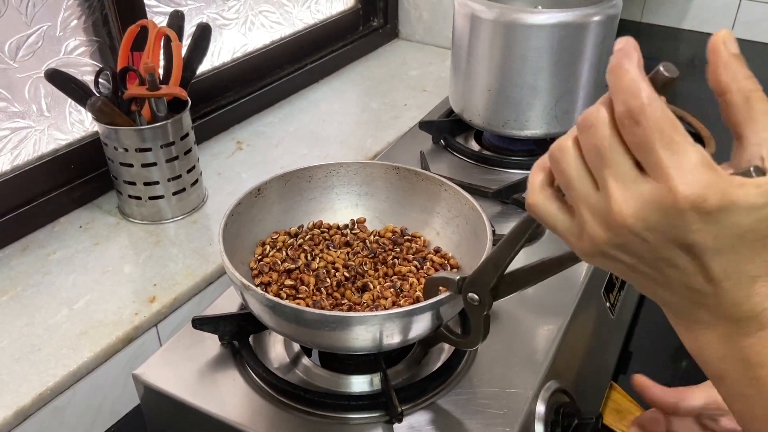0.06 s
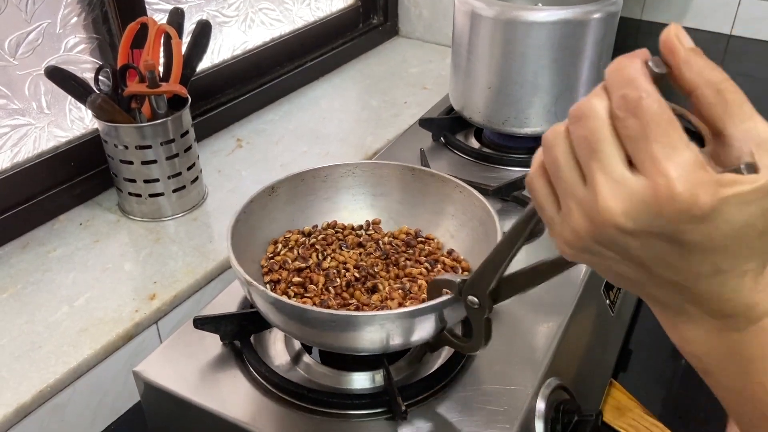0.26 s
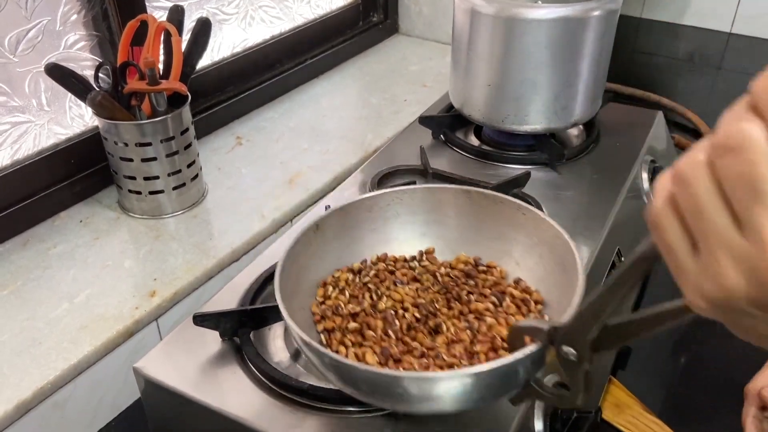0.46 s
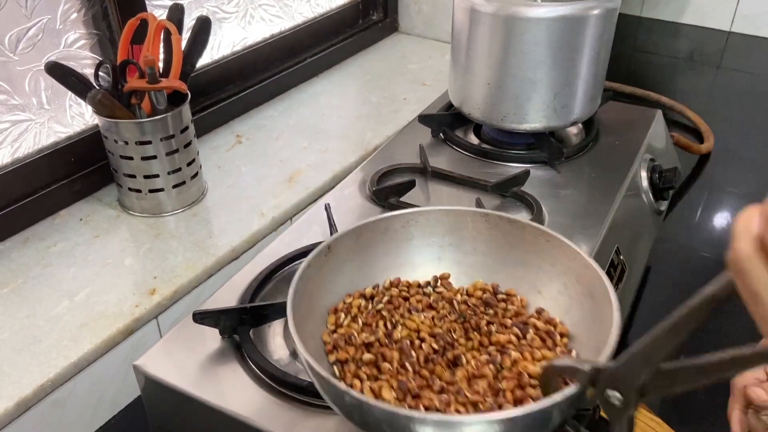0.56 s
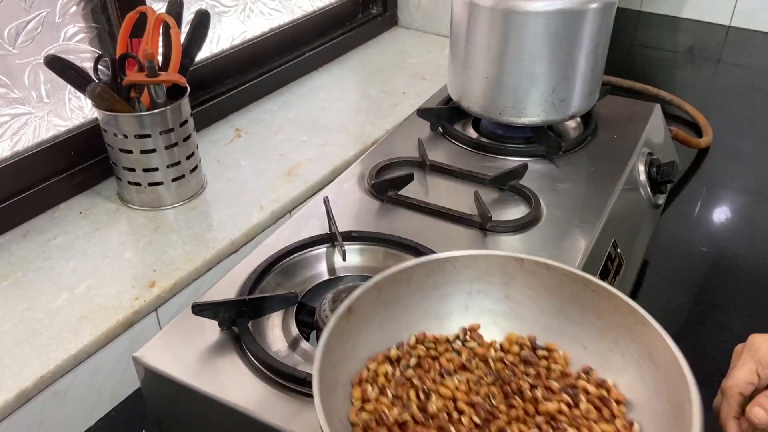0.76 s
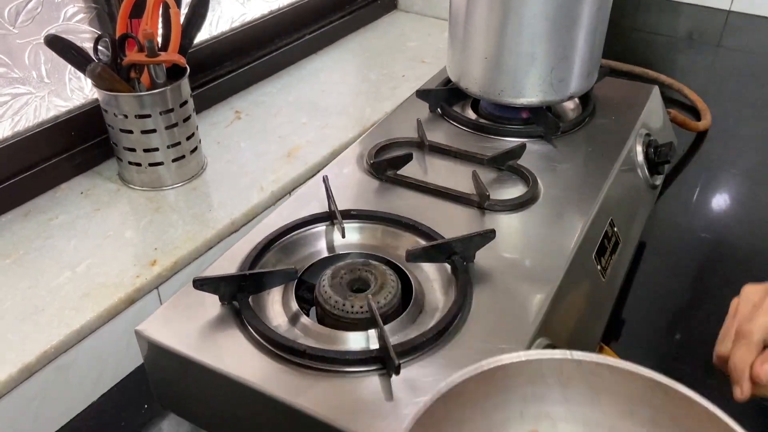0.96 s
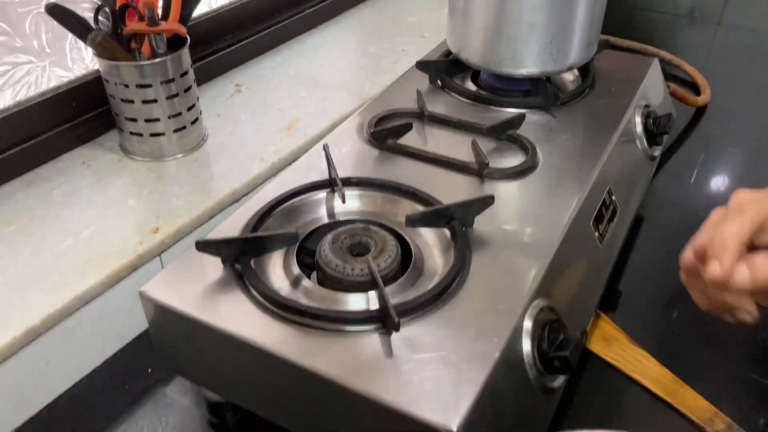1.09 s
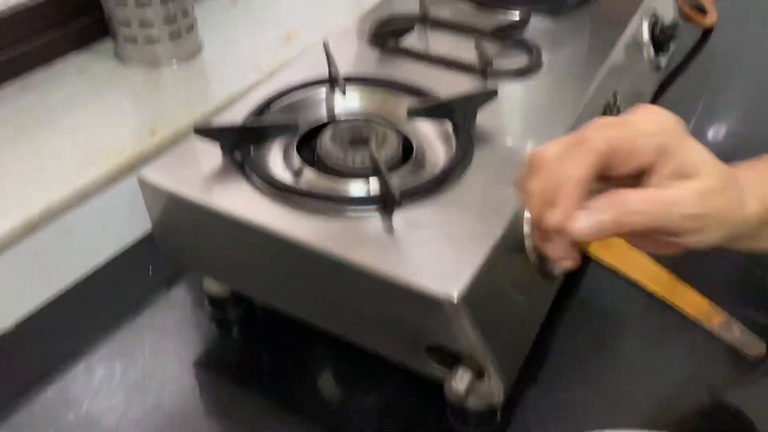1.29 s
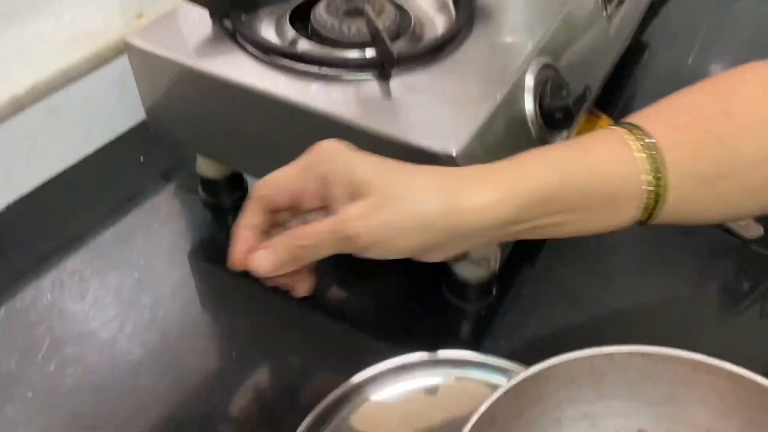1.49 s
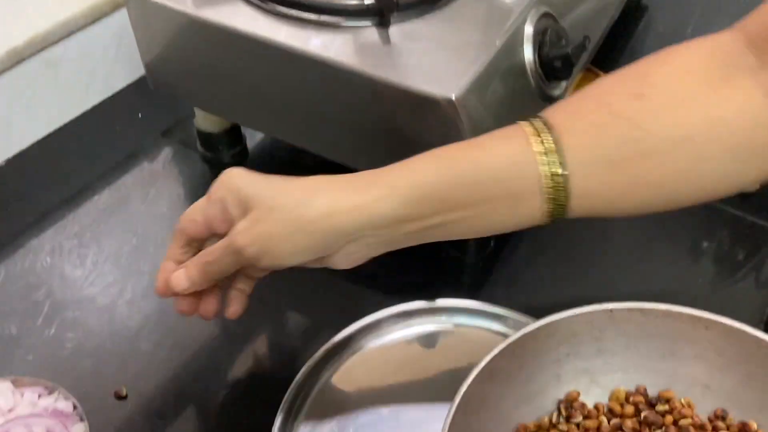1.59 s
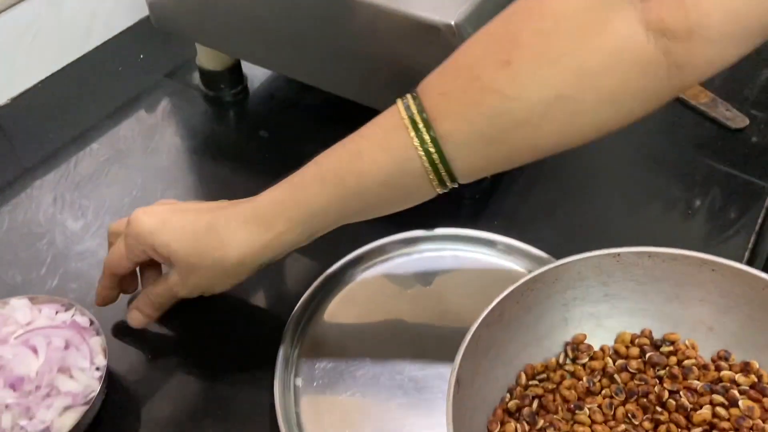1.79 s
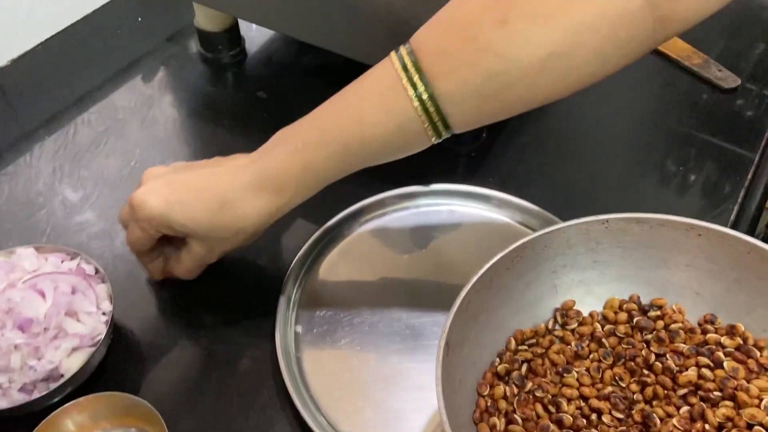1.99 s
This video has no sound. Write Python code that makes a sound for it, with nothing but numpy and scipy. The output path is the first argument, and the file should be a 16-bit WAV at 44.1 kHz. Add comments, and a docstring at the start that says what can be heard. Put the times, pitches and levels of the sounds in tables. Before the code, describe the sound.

Loud snapping beans, first a fading crack, then a close pair, a dull metallic scrape under them, a lone pop, and a denser run of snaps with tiny steam squeaks; quiet gas hum, bright hard-walled kitchen, stereo close microphone.

```python
"""The ringing end of a crack opens the scene, over a pan's rough scrape: dry beans roast in a small tiled kitchen.
The pan sticks and slips off the burner grate and is carried close past the microphone while beans burst.
Each burst is a sharp noise crack with a knock, decaying shell tones and a low thump of falling pitch;
some follow a squeak of steam, made of wobbling whistles and hiss. Decaying noise makes the bright room.
Coloured noise makes the stove's flame, sines a low hum and soft swells of air underneath."""
import sys
import numpy as np
from scipy import signal
from scipy.fft import rfft, irfft
from scipy.io import wavfile
from scipy.ndimage import uniform_filter1d

SR = 44100
rng = np.random.default_rng(int(sys.argv[2]) if len(sys.argv) > 2 else 0)


def wav_out(sig):
    """Save sig, one row per channel (or a flat mono array), as 16-bit PCM at SR to the path in sys.argv[1]."""
    wavfile.write(sys.argv[1], SR, np.round(np.clip(np.atleast_2d(sig).T, -1, 1) * 32767).astype(np.int16))


N = 90404  # length in samples
LEAD = SR // 5  # samples of track ahead of time zero, for sounds already under way

# likeness of left and right for the spread sources: frequency_hz, likeness (0 to 1)
LEFT_RIGHT_LIKENESS = [(50, 1), (200, 1), (500, 0.61), (1200, 0.089), (6000, 0.2)]


def amp(db):
    """A level in decibels is a logarithmic ratio; returns the amplitude gain."""
    return 10 ** (np.asarray(db) / 20)


def unit(x):
    """Normalizes mean power: scales to rms 1."""
    return x / np.sqrt(np.mean(x ** 2) + 1e-20)


def read(points, hz):
    """Interpolates a table over log frequency, near the ear's own scale of pitch."""
    f, value = np.transpose(points)
    return np.interp(np.log(hz + 1), np.log(f + 1), value)


def level(points):
    """An envelope: gain over time, linear in decibels between (s, dB) points."""
    return amp(np.interp(np.arange(N) / SR, *np.transpose(points)))


def add(mix, s, sound):
    """Superposition: adds a sound at time s to a track that starts LEAD samples early."""
    part = mix[max(round(s * SR) + LEAD, 0):][:len(sound)]
    part += sound[:len(part)]


def colour(x, points, size=2048):
    """Minimum-phase filter of unit energy: the log gain's Hilbert transform gives a causal phase."""
    log_gain = np.log(amp(read(points, abs(np.fft.fftfreq(size, 1 / SR)))))
    taps = np.fft.ifft(np.exp(signal.hilbert(log_gain).conj())).real
    return signal.lfilter(taps / np.linalg.norm(taps), 1, x)


def tilted(points, db_per_octave):
    """Spectral tilt: a spectrum made brighter or duller around 5 kHz."""
    return [(hz, db + db_per_octave * np.log2(hz / 5000)) for hz, db in points]


def pair(z, likeness):
    """Coherence: mid and side sums give two unrelated signals a likeness at each frequency."""
    c = np.clip(read(likeness, np.fft.rfftfreq(z.shape[1], 1 / SR)), 0, 1)
    a, b = rfft(z)
    mid = a * np.sqrt((1 + c) / 2)
    side = b * np.sqrt((1 - c) / 2)
    return irfft(np.array([mid + side, mid - side]), z.shape[1])


def room(x):
    """Reverberation: dense early reflections from stove and counter, then the longer ring of the tiles."""
    # reverberation time of the tiles: frequency_hz, t60_s
    tile_t60 = [(250, 0.54), (700, 0.49), (1800, 0.66), (4600, 0.64), (8000, 0.56), (15000, 0.43)]
    early_t60_s, early_db = 0.16, 16  # level relative to the onset of the tiles' ring
    rise_s = 0.0006
    hz, t, z = signal.stft(rng.standard_normal((2, SR)), SR, nperseg=256)
    tiles = amp(-60 * t / read(tile_t60, hz)[:, None])
    early = amp(early_db - 60 * t / early_t60_s)
    tail = signal.istft(z * np.hypot(tiles, early), SR, nperseg=256)[1]
    rise = np.minimum(np.arange(tail.shape[1]) / SR / rise_s, 1)
    tail = pair(tail * rise, [(100, 1.0), (450, 0.32)])  # bass alike, the rest diffuse
    return signal.fftconvolve(x[None], tail / np.linalg.norm(tail[0]), axes=1)[:, :len(x)]


def crack(decay_ms):
    """Impulsive release: a plain click and the tearing skin, whitened, then faded to unit energy."""
    click_share = 0.33  # plain click against tearing of unit energy
    ms = np.arange(SR // 100) * 1000 / SR
    tear = rng.standard_normal(len(ms)) * np.exp(-ms / decay_ms)
    z = rfft(tear / np.linalg.norm(tear)) - click_share
    even = irfft(z / abs(z), len(ms))  # keeps the phase, flattens the spectrum
    burst = even * np.exp(-ms / decay_ms / 6)
    return np.pad(burst / np.linalg.norm(burst), (0, SR - len(ms)))


def thump(decay_ms):
    """A downward chirp: pitch falls roughly as sweep / time and settles into a faint boom."""
    end_hz, sweep_cycles, rise_s = 42.3, 1.088, 0.0016
    boom_db, boom_s = -32, 0.062  # relative to the thump; decay time constant
    t = np.arange(SR // 2) / SR
    hz = np.hypot(end_hz, sweep_cycles / (t + 0.00035))
    rise = 1 - np.exp(-(t / rise_s) ** 2.5)
    fade = np.exp(-1000 * t / decay_ms) + amp(boom_db) * np.exp(-t / boom_s)
    return rise * fade * np.sin(2 * np.pi * np.cumsum(hz) / SR)


def pops():
    """Impulse excitation: each bean cracks, knocks, rings and thumps; the room throws the crack back."""
    # bursting beans: start_s, crack_db, crack_decay_ms (of the tear before whitening), shell_pitch_hz,
    # shell_db, brightness_db_per_octave, knock_db, room_db, thump_db, thump_decay_ms
    beans = [(-.055, 2, .54, 6500, -9, -3, -15, 4.5, -47.5, 12),
             (.209, -39, 0.8, 6600, -45, -5, -53.5, -20, -59.5, 5),
             (0.3052, 4, 2.5, 7250, -4.5, .5, -13.5, 8.5, -53.5, 5),
             (0.3117, -0.5, .9, 5930, -11, -.5, -20, 1.5, -41, 7),
             (.602, -49.5, 2.9, 5900, -43, -3, -53, -30, -61.5, 5.2),
             (0.8536, -29, 0.71, 4270, -35.5, -2, -51.5, -31, -60.5, 5),
             (.905, 5, 0.45, 6230, -3, 0.5, -10.5, 4.5, -28, 17.7),
             (1.2849, 2.5, 0.51, 4480, -8, 0.6, -6.5, 4.5, -26.5, 14),
             (1.343, 2, 1.4, 7560, -4, 1.2, -8.5, 4.5, -13.5, 16.5),
             (1.5086, 3, 0.38, 6830, 1.5, -.5, -6.5, 2.5, -17, 11.4),
             (1.68, 6.5, 0.2, 6450, -1, 0.5, -1, 5.5, -10.5, 3.46),
             (1.753, 2, 1.1, 3810, -1, .5, -7.5, 2, -22, 11),
             (1.7663, 2.5, 0.64, 4630, -1, -.3, -9.5, 3.5, -34.5, 14)]
    # colour of the crack before tilting: frequency_hz, level_db
    crack_colour = [(150, -30), (600, -11), (1200, -3), (2000, -1), (4000, -6), (6800, 3), (8200, 2.5),
                    (11000, 4.5), (14000, 0.5), (15600, -5)]
    # colour of its echo before tilting: frequency_hz, level_db
    echo_colour = [(150, -21.5), (500, -8.5), (1000, -4.5), (2200, -2.5), (3500, -0.5), (5300, 2.5),
                   (7500, 2), (10000, 0), (15600, -3)]
    # colour of the knock under the crack: frequency_hz, level_db
    knock_colour = [(150, -20.5), (500, -9), (1000, 7.5), (1550, -6), (2200, -2), (3500, -10), (12000, -47)]
    shell_decay_ms = 0.86
    hollow_hz, hollow_db = 3780, -13.5  # lower ring all beans share, relative to the crack
    out = np.zeros((2, N + LEAD))
    t = np.arange(SR) / SR
    fade = np.exp(-1000 * t / shell_decay_ms)
    for s, crack_db, crack_ms, shell_hz, shell_db, bright_db, knock_db, room_db, thump_db, thump_ms in beans:
        burst = crack(crack_ms)
        shell, hollow = (fade * np.sin(2 * np.pi * (hz * t + rng.random())) for hz in (shell_hz, hollow_hz))
        snap = colour(burst, tilted(crack_colour, bright_db))
        snap = snap + amp(shell_db - crack_db) * shell / np.linalg.norm(shell)
        snap = snap + amp(hollow_db) * hollow / np.linalg.norm(hollow)
        knock = colour(-1. * (t == 0), knock_colour)
        direct = amp(crack_db) * snap + amp(knock_db) * knock
        echo = amp(room_db) * room(colour(burst, tilted(echo_colour, bright_db)))
        for side, heard in zip(out, direct + echo):
            add(side, s, heard)
            add(side, s, amp(thump_db) * thump(thump_ms))
    return out[:, LEAD:]


def ringing(modes):
    """Modal synthesis: a struck object rings as a sum of decaying sines, here with unit energy."""
    t = np.arange(SR // 2) / SR
    ring = np.zeros(len(t))
    for hz, db, t60 in modes:
        tone = np.sin(2 * np.pi * (hz * t + rng.random()))
        ring += amp(db - 60 * t / t60) * tone / np.sqrt(t60)  # long modes gain no extra energy
    return ring / np.linalg.norm(ring)


def drag():
    """Stick-slip friction: clumped slips drive the pan; hard pushes add grit, and the grate rings on."""
    # force of the pan dragged over the grate: time_s, level_db
    force_curve = [(0, -48.5), (.026, -44), (.08, -46), (.12, -61), (.178, -53.5), (.19, -36.5), (.27, -35),
                   (.41, -34.5), (.44, -35.5), (.458, -32), (.502, -31), (.525, -45), (.61, -46.5),
                   (.636, -41.5), (.665, -52.5), (.78, -64), (.9, -100)]
    # colour of the rubbing: frequency_hz, level_db
    rub_colour = [(40, -49.5), (110, -18.5), (200, -4.5), (300, 4.5), (500, 1), (900, -2.5), (1500, -13),
                  (2200, -15.5), (3200, -30.5), (7000, -35), (15000, -54)]
    # colour of the grit: frequency_hz, level_db
    grit_colour = [(100, -43.5), (900, -1.5), (1250, 3), (2200, -1), (3200, -17.5), (15000, -44.5)]
    # modes of the grate under the pan: pitch_hz, energy_level_db, t60_s
    grate_modes = [(287, 0, .5), (323, -5, .3), (349, -3, .35), (464, 0, .3), (484, -3, .4), (521, -3, .25),
                   (549, -4, .4), (603, -5, .3), (748, -3, .25), (793, -3, .35), (886, -3, .35),
                   (975, -6, .2), (1210, -7, .2)]
    slips_per_s, slip_spread_db = 1400, 2.5
    clump_db, clump_s = 3, .008
    grit_db = -10.5  # at the hardest push
    grate_db, wet_db = -3.5, 2.5  # wet: room against direct sound
    size, chance = rng.standard_normal((3, N)), rng.random((3, N))
    slip_gain = amp(slip_spread_db * np.minimum(abs(size), 2.5))
    slips = unit(slip_gain * np.sign(size) * (chance < slips_per_s / SR))
    drift = unit(uniform_filter1d(rng.standard_normal(N), round(clump_s * SR)))
    clumps = unit(amp(clump_db * np.clip(drift, -2, 2)))
    force = level(force_curve)
    push = slips * clumps * force
    rub = colour(push[2], rub_colour)
    grit = amp(grit_db) * colour(push[0] * force / force.max(), grit_colour)  # grows as force squared
    direct = rub + grit
    ring = ringing(grate_modes)[None]
    grate = signal.fftconvolve(pair(push[:2], LEFT_RIGHT_LIKENESS), ring, axes=1)[:, :N]
    scrape = (direct + amp(wet_db) * room(direct)) / np.hypot(1, amp(wet_db))
    return scrape + amp(grate_db) * grate


def stove():
    """Turbulent combustion: flame noise and a near-steady hum, both dipping near 1.85 s and coming back."""
    # colour of the flame: frequency_hz, level_db
    flame_colour = [(25, -26.5), (50, -2), (100, 2), (150, -11), (290, -2), (500, -11), (1000, -11.5),
                    (2000, -18.5), (4000, -31.5), (8000, -39), (15000, -40.5)]
    # flame level: time_s, level_db
    flame_curve = [(0, -55), (.8, -52), (1.1, -50.5), (1.5, -52.5), (1.75, -55), (1.85, -63), (1.97, -52.5),
                   (2.05, -57)]
    # hum level: time_s, level_db
    hum_curve = [(0, -54.5), (.1, -49.5), (.8, -51), (1.22, -49), (1.45, -57), (1.85, -65.5), (2.05, -53)]
    hum_hz, hum_waver = 200.9, 0.0057  # mean pitch; rms waver as a fraction of it
    noise = pair(rng.standard_normal((2, N + LEAD)), LEFT_RIGHT_LIKENESS)
    flame = unit(colour(noise, flame_colour)[:, LEAD:])
    waver = unit(uniform_filter1d(uniform_filter1d(rng.standard_normal(N), 4000), 4000))
    hum = np.sqrt(2) * np.sin(2 * np.pi * np.cumsum(hum_hz * (1 + hum_waver * waver)) / SR)
    return flame * level(flame_curve) + hum * level(hum_curve)


def swells():
    """Low-frequency pressure of air moving past the microphone: sines under Gaussian envelopes."""
    # swells of air: top_s, width_s, level_db, pitch_hz
    air = [(0.883, 0.013, -39, 72), (1.478, 0.082, -42, 49), (1.665, 0.029, -43, 52)]
    t = np.arange(N) / SR
    out = np.zeros(N)
    for s, width, db, hz in air:
        envelope = amp(db) * np.exp(-((t - s) / width) ** 2)
        out += envelope * np.sqrt(2) * np.sin(2 * np.pi * hz * (t - s))
    return out


def squeaks():
    """Jet whistling: steam forces a split in the skin; two unsteady tones and a hiss swell to the burst."""
    # steam just before a burst: start_s, length_s, whistle_db, pitch_hz, hiss_db
    jets = [(0.891, 0.011, -57, 5420, -51.5), (1.267, 0.018, -52, 6000, -46),
            (1.495, .0138, -36.5, 5980, -31), (1.664, .016, -23, 6700, -38.5)]
    # colour of the hiss: frequency_hz, level_db
    steam_colour = [(500, -7.5), (1500, 0), (2700, 6), (5500, -3.5), (8000, -4), (15000, -26.5)]
    low_ratio, low_db = 0.61, -7  # lower whistle: pitch ratio and relative level
    wobble_depth, wet_db = 0.038, -7  # rms fraction of the pitch; room level
    out = np.zeros(N + LEAD)
    for s, length, db, hz, hiss_db in jets:
        swell = np.linspace(0, 1, round(length * SR))
        wobble, flutter, hiss = rng.standard_normal((3, SR // 20))[:, :len(swell)]
        pitch = hz * (1 + wobble_depth * unit(uniform_filter1d(wobble, 30)))
        phase = 2 * np.pi * np.cumsum(pitch) / SR
        flow = amp(2 * unit(uniform_filter1d(flutter, 50)))
        whistle = unit(flow * (np.sin(phase) + amp(low_db) * np.sin(low_ratio * phase)))
        add(out, s, swell * (amp(db) * whistle + amp(hiss_db) * colour(hiss, steam_colour)))
    return (out + amp(wet_db) * room(out))[:, LEAD:]


def scene():
    """Linear superposition of everything in the kitchen."""
    return pops() + drag() + stove() + swells() + squeaks()


def record(dry):
    """Shared treble and saturation: above 7 kHz both channels carry one signal, the left's phase turning
    steadily behind; peaks are rounded, then the band is limited."""
    # phase by which the left channel leads: frequency_hz, lead_rad
    bass_lead = [(30, 0.14), (200, 0.42), (700, 0.47), (1500, 0)]
    # balance of the channels: frequency_hz, left_minus_right_db
    balance = [(200, -0.9), (600, 2), (1200, -0.5), (2500, 1), (4500, 3), (7000, 1), (9000, 0)]
    shared_hz, turn_hz = 7000, 4250  # treble shared by both channels; one phase turn per turn_hz, two at most
    edge_hz, ceiling = 16300, .8
    hz = np.fft.rfftfreq(N + LEAD, 1 / SR)
    left, right = rfft(dry, N + LEAD)
    blend = np.clip((hz - shared_hz) / 800 + .5, 0, 1)
    lag = np.exp(-2j * np.pi * np.clip((hz - shared_hz) / turn_hz, 0, 2))
    left = ((1 - blend) * left + blend * right) * lag
    left = left * np.exp(1j * read(bass_lead, hz))
    tilt = amp(read(balance, hz) / 2)
    out = irfft(np.array([left * tilt, right / tilt]), N + LEAD)[:, :N]
    out = out / (1 + (out / ceiling) ** 4) ** .25
    low_pass = signal.firwin(129, edge_hz, window=("kaiser", 8), fs=SR)
    return signal.oaconvolve(out, low_pass[None], "same")


dry = scene()
out = record(dry)
wav_out(out)
```